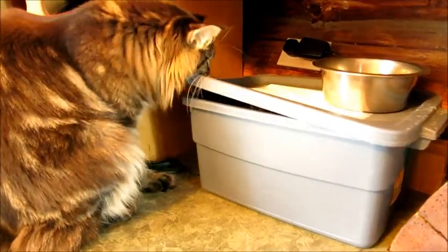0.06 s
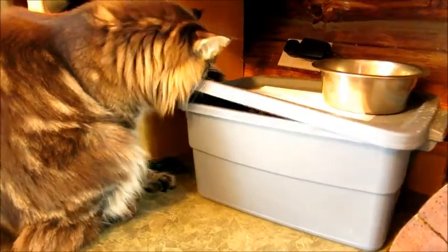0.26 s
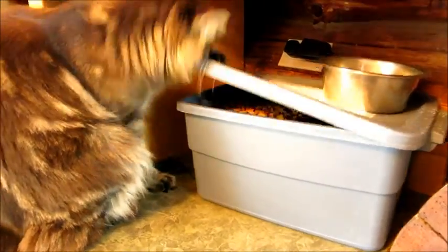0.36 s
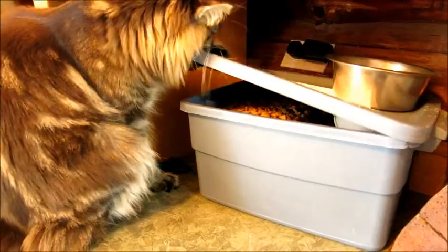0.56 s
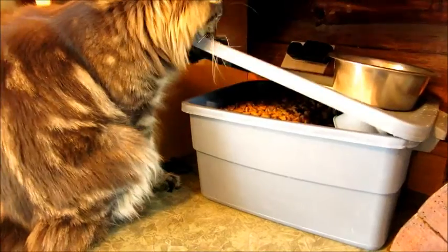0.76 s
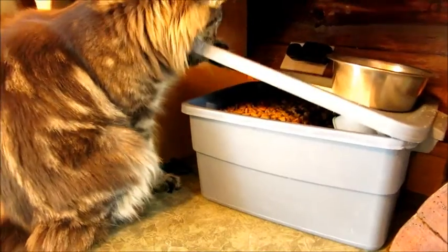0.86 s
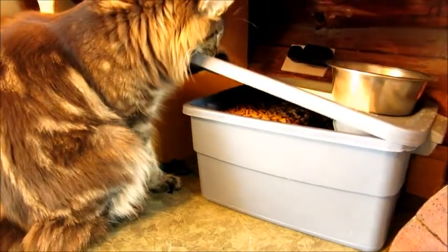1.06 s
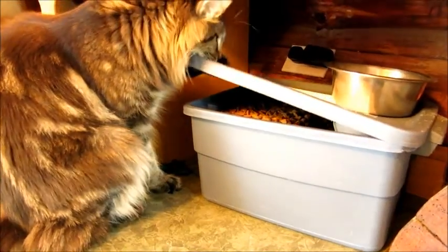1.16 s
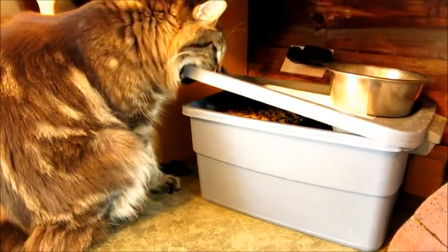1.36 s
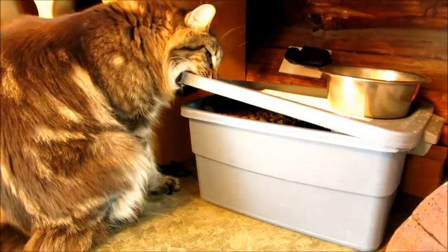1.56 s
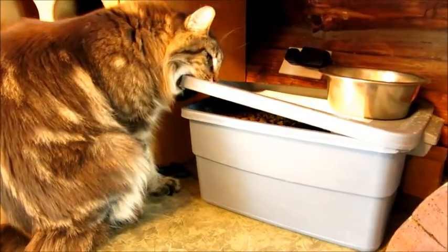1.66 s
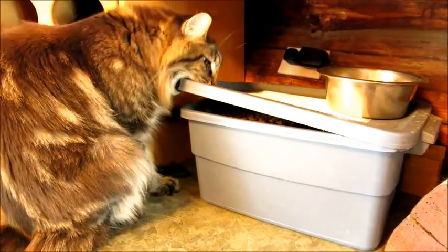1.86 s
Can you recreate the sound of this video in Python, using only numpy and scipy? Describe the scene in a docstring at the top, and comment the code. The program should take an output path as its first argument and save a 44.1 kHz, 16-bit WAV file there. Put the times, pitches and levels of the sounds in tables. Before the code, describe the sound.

Sharp snap and hollow thump of a plastic bin lid popping open, followed by light ticks.

```python
"""A small wooden room, a stereo microphone close to a plastic food bin. A cat noses up the lid: the rim
scrapes, gives and snaps free with a hard crack, then the hollow boom of the bin. The loose lid bumps
and ticks as it is pushed higher, and a steel bowl on it rings faintly. The snap overloads the
microphone, whose gain control ducks everything, so the low room noise sinks and creeps back."""
import sys
import numpy as np
from scipy import signal
from scipy.fft import rfft, irfft, next_fast_len
from scipy.io import wavfile
from scipy.ndimage import map_coordinates

SR = 44100
rng = np.random.default_rng(int(sys.argv[2]) if len(sys.argv) > 2 else 0)


def file_out(sig):
    """Save sig as 16-bit WAV at sys.argv[1]."""
    # one column per channel
    cols = np.atleast_2d(sig).T
    # limit, then scale
    lim = np.clip(cols, -1, 1)
    pcm = np.round(lim * 32767).astype(np.int16)
    wavfile.write(sys.argv[1], SR, pcm)


N = 83790

# Levels in the tables are relative, within each layer.
# the catch letting go in quick slips: start_s, level_db
CATCH_SLIPS = [(.3956, -22), (.3969, 1.5), (.3982, -3), (.3989, -8)]
# the lid meeting the bin: start_s, tick_db, tick_cutoff_hz, boom_db, wall_db
LID_BUMPS = [(0.2126, -25.5, 2200, -29, -25), (.217, -30, 800, -6.5, -27), (0.257, -40.5, 1500, -35, -37),
             (.398, -15.5, 8950, 2, -11.5), (0.428, -22.5, 5000, -40, -34), (0.45, -29, 7000, -21, -22.5),
             (.475, -23, 5360, -18, -19.5), (.5075, -19, 3500, -27, -16), (.5785, -19, 7000, -25, -20),
             (1.281, -38, 3000, -41, -22.5), (1.592, -25, 5470, -48, -46), (1.599, -28, 4000, -15.5, -23.5),
             (1.637, -41, 2000, -26, -25), (1.672, -50, 2060, -46, -32)]
# modes of the rim, the air in the bin, its walls and the steel bowl: pitch_hz, level_db, t60_s
RIM_MODES = [(462, -20, 0.095), (562, -20.5, 0.058), (721, -14.5, .05), (1112, -18, 0.063),
             (1264, -8, 0.021), (1431, -5.5, .03), (1702, -6.5, 0.029), (2070, -14.5, .04),
             (2311, -10.5, 0.022), (2605, -8.5, .025), (3575, -29, 0.04), (4230, -18, 0.019),
             (5380, -19.5, 0.034), (6280, -22, 0.03)]
CAVITY_MODES = [(128, -15.5, 0.12), (159.7, -4, 0.055), (195, -5.5, 0.044)]
WALL_MODES = [(217.5, -6, 0.072), (253.5, 4, 0.074), (373, -11, .06)]
BOWL_MODES = [(1885, -51, .45)]
# the rim rubbing on the bin: time_s, level_db
RUB_LEVELS = [(0, -51.5), (.12, -48), (.19, -44), (.27, -47.5), (.39, -47), (0.471, -46.5), (.53, -51.5),
              (.575, -47.5), (.615, -41), (.66, -71)]
# tiny snags in the rubbing: start_s, level_db
RUB_SNAGS = [(.0433, -48), (0.0724, -38)]
# spectra of the crack, ticks and rubbing up close, and of the rush and hiss behind: freq_hz, level_db
CRACK_SPECTRUM = [(150, -15.5), (700, -1), (1000, 6), (1500, 0), (2800, 2.5), (4200, 3), (6500, -8.5),
                  (9000, -13.5), (12000, -12), (16000, -15.5)]
TICK_SPECTRUM = [(150, -10), (500, 0), (800, -6), (1200, 3.5), (1700, -5.5), (2500, -6), (3500, -18),
                 (6000, -12.5), (9000, -20), (16000, -12)]
RUB_SPECTRUM = [(300, -34), (1500, 1.5), (3000, -5.5), (5500, -1), (9000, -5), (12000, -8), (16000, -20)]
RUSH_SPECTRUM = [(15, -59), (25, -34), (59, -20), (73, -17.5), (110, -2.5), (148, -12), (183, -7.5),
                 (215, -6), (246, 3), (274, -11), (313, -11), (389, -3), (421, -9), (469, -6), (741, -13.5),
                 (970, -12.5), (1050, -18), (1450, -17), (3170, -39.5), (11500, -45), (15500, -57)]
HISS_SPECTRUM = [(1000, -11), (4000, -3), (9000, -12), (13000, -9.5), (16000, -13)]
# likeness of left and right, for close sounds and for the room: freq_hz, correlation
NEAR_CORRELATION = [(200, 1), (2000, 0.71), (5000, 0.86), (8000, 0.39), (12000, .15)]
ROOM_CORRELATION = [(40, 0.45), (120, 0.57), (250, 0.57), (500, 0.42), (1200, 0.34), (4000, 0.27),
                    (12000, .1)]
# decay of the wooden room: freq_hz, t60_s
ROOM_DECAY = [(120, 0.48), (250, 0.37), (1000, 0.47), (2300, 0.68), (4200, 0.4), (7000, 0.28),
              (14000, 0.24)]

SNAP_S, BOWL_JOLT_S = 0.3969, 0.63
RIM_ATTACK_S, BODY_ATTACK_S, BOOM_DELAY_S, WALL_DELAY_S = 0.00018, 0.0025, 0.0026, 0.0019
RIM_PAN_DB, CRACK_PAN_DB, BODY_PAN_DB, RUSH_PAN_DB = 0.4, -0.4, 1.6, 0.7
RIM_WET_DB, BODY_WET_DB, ROOM_BUILD_S = -16.5, -11, 0.006
DUCK_ABOVE_DB, DUCK_SLOPE, DUCK_ATTACK_S, DUCK_RELEASE_S = -8.5, 1.444, 0.14, 0.67


def lid_snap(ring_db=1.5, click_db=7.5, fizz_db=-9):
    """Right at the microphone, each slip of the catch clicks and fizzes; the freed rim rings."""
    rim = amp(ring_db) * ring(RIM_MODES, SNAP_S, RIM_ATTACK_S)
    clicks = sum(amp(db + click_db) * click(CRACK_SPECTRUM, start_s) for start_s, db in CATCH_SLIPS)
    fizz_level = sum(amp(db + fizz_db) * fade(start_s, t60_s=0.014) for start_s, db in CATCH_SLIPS)
    fizz = fizz_level * noise(CRACK_SPECTRUM, NEAR_CORRELATION)
    return pan(RIM_PAN_DB) * rim + pan(CRACK_PAN_DB) * (clicks + fizz)


def bin_boom(low_cut_hz=125):
    """Just after each contact the walls flex and the air inside the bin booms."""
    body = np.zeros(N)
    for start_s, _, _, boom_db, wall_db in LID_BUMPS:
        body += amp(boom_db) * ring(CAVITY_MODES, start_s + BOOM_DELAY_S, BODY_ATTACK_S, polarity=1)
        body += amp(wall_db) * ring(WALL_MODES, start_s + WALL_DELAY_S, BODY_ATTACK_S, polarity=1)
    # the microphone's low cut thins the deepest bass of the boom
    low_cut = signal.butter(2, low_cut_hz, "high", fs=SR, output="sos")
    return pan(BODY_PAN_DB) * signal.sosfilt(low_cut, body)


def lid_ticks(click_db=14, scuff_db=-3, ring_db=-11):
    """Lighter contacts of the rim: a click, a scuff and a short ring, each with its own brightness."""
    scuff = amp(scuff_db) * noise(TICK_SPECTRUM, NEAR_CORRELATION)
    ticks = np.zeros((2, N))
    for start_s, tick_db, cutoff_hz, _, _ in LID_BUMPS:
        contact = amp(click_db) * click(TICK_SPECTRUM, start_s) + fade(start_s, t60_s=0.062) * scuff
        rim = amp(ring_db) * ring(RIM_MODES, start_s, RIM_ATTACK_S)
        low_pass = signal.butter(2, cutoff_hz, fs=SR, output="sos")
        ticks += amp(tick_db) * signal.sosfilt(low_pass, contact + rim)
    return pan(RIM_PAN_DB) * ticks


def rim_rubbing(grain_db=1.5):
    """A fine, grainy hiss close by while the rim slides on the bin, with two tiny snags."""
    level_db = np.interp(np.arange(N) / SR, *np.transpose(RUB_LEVELS))
    sliding = amp(level_db + grain_db * wobble(knots_per_s=210))
    snags = sum(amp(db) * fade(start_s, t60_s=0.02) for start_s, db in RUB_SNAGS)
    return (sliding + snags) * noise(RUB_SPECTRUM, NEAR_CORRELATION)


def steel_bowl():
    """The bowl on the lid is jolted and rings faintly on one note."""
    return ring(BOWL_MODES, BOWL_JOLT_S, RIM_ATTACK_S)


def room_reverb(sound):
    """The wooden walls answer with a short tail, partly alike in both channels."""
    white = noise([(20, 0), (20000, 0)], ROOM_CORRELATION)[:, :SR // 2]
    hz, t, bands = signal.stft(white, SR, nperseg=256)
    decay = amp(-60 * t / along(ROOM_DECAY, hz)[:, None])
    build_up = 1 - np.exp(-t / ROOM_BUILD_S)
    _, tail = signal.istft(bands * decay * build_up, SR, nperseg=256)
    return signal.fftconvolve(sound, tail / np.linalg.norm(tail[0]), axes=1)[:, :N]


def room_tone(rush_db=-33.5, waver_db=0.4, hiss_db=-56.5):
    """Behind the bin, a low rush that barely wavers, and a faint hiss."""
    rush = amp(rush_db + waver_db * wobble(knots_per_s=12.06)) * noise(RUSH_SPECTRUM, ROOM_CORRELATION)
    hiss = amp(hiss_db) * noise(HISS_SPECTRUM, ROOM_CORRELATION)
    return pan(RUSH_PAN_DB) * rush + hiss


def ring(modes, start_s, attack_s, polarity=-1, scatter_db=1):
    """Damped modes, their levels varying with each strike; polarity -1 opposes neighbouring modes."""
    t = np.arange(SR // 2) / SR
    tone = np.zeros(len(t))
    for k, (pitch_hz, db, t60_s) in enumerate(modes):
        struck_db = db + scatter_db * rng.standard_normal()
        tone += polarity ** k * amp(struck_db - 60 * t / t60_s) * np.sin(2 * np.pi * pitch_hz * t)
    return np.pad(tone * (1 - np.exp(-t / attack_s)), (round(start_s * SR), N))[:N]


def click(spectrum, start_s, size=2048):
    """One sharp, minimum-phase pulse of the given spectrum, energy 1."""
    cepstrum = irfft(np.log(amp(along(spectrum, np.fft.rfftfreq(size, 1 / SR)))))
    causal_fold = np.r_[1, np.full(size // 2 - 1, 2), np.zeros(size // 2)]
    pulse = irfft(np.exp(rfft(cepstrum * causal_fold)))
    return np.pad(pulse / np.linalg.norm(pulse), (round(start_s * SR), N))[:N]


def noise(spectrum, correlation):
    """Coloured stereo noise of rms 1, with the given likeness of left and right."""
    def mid_side_gains(hz):
        angle = np.arccos(np.clip(along(correlation, hz), -1, 1)) / 2
        return amp(along(spectrum, hz)) * [np.cos(angle), np.sin(angle)]

    mid, side = filtered(rng.standard_normal((2, N)), mid_side_gains)
    stereo = np.array([mid + side, mid - side])
    return stereo / np.sqrt(np.mean(stereo ** 2))


def fade(start_s, t60_s):
    """Silence, then a sudden start and an exponential decay."""
    t = np.arange(N) / SR - start_s
    return (t >= 0) * amp(-60 * np.abs(t) / t60_s)


def wobble(knots_per_s):
    """A smooth random curve."""
    return map_coordinates(rng.standard_normal(N // 20), [np.arange(N) * knots_per_s / SR], mode="wrap")


def filtered(sound, response):
    """Shape a sound by a gain that depends on frequency."""
    size = next_fast_len(N + SR // 2)
    return irfft(rfft(sound, size) * response(np.fft.rfftfreq(size, 1 / SR)), size)[..., :N]


def along(points, hz):
    """Read (freq_hz, value) points on a log frequency axis."""
    freq_hz, values = np.transpose(points)
    return np.interp(np.log(hz + 1), np.log(freq_hz + 1), values)


def pan(db):
    """Left and right gains; positive leans left."""
    return amp([[db], [-db]])


def amp(db):
    """Decibels to gain."""
    return 10 ** (np.asarray(db) / 20)


def scene():
    """Lid, bowl and bin close to the microphone, the room behind them."""
    lid = lid_snap() + lid_ticks() + steel_bowl()
    body = bin_boom()
    reverb = room_reverb(amp(RIM_WET_DB) * lid + amp(BODY_WET_DB) * body)
    return lid + body + reverb + rim_rubbing() + room_tone()


def record(dry, top_hz=15850, edge_hz=400):
    """The microphone's gain ducks after loud peaks and creeps back; peaks clip; the top ends steeply."""
    peak = np.minimum(np.abs(dry).max(axis=0), 1)
    over_db = np.maximum(20 * np.log10(peak + 1e-9) - DUCK_ABOVE_DB, 0)
    release = np.exp(-np.arange(N) / SR / DUCK_RELEASE_S)
    held_db = np.maximum.accumulate(over_db / release) * release  # each peak is held as it dies away
    attack_step = 1 - np.exp(-1 / (DUCK_ATTACK_S * SR))
    duck_db = DUCK_SLOPE * signal.lfilter([attack_step], [1, attack_step - 1], held_db)
    clipped = np.clip(dry * amp(-duck_db), -1, 1)
    return filtered(clipped, lambda hz: np.clip((top_hz - hz) / edge_hz + 0.5, 0, 1))


dry = scene()
out = record(dry)
file_out(out)
```